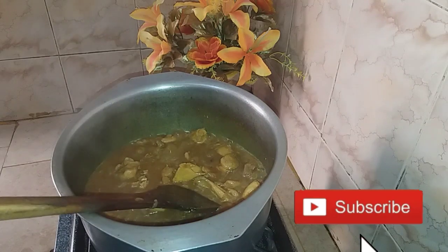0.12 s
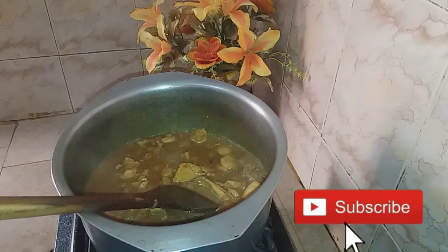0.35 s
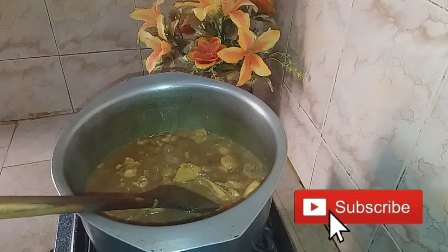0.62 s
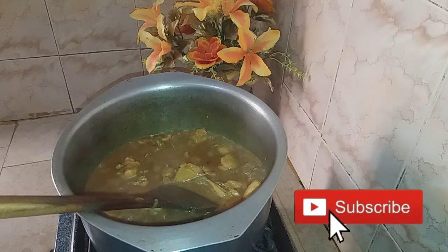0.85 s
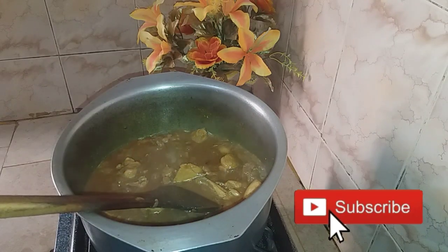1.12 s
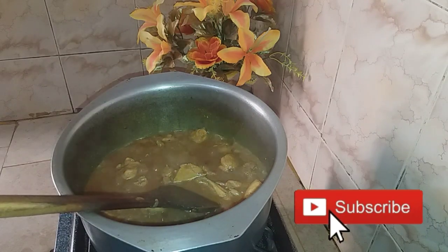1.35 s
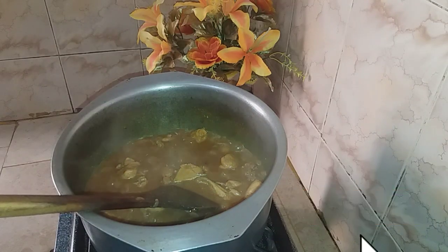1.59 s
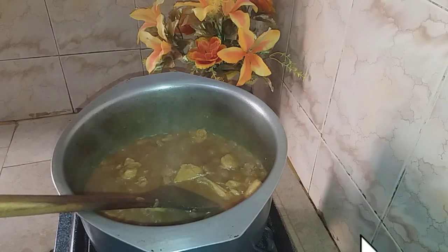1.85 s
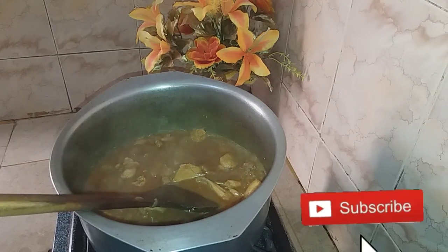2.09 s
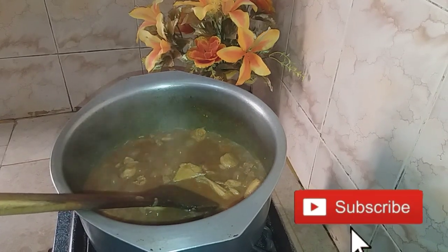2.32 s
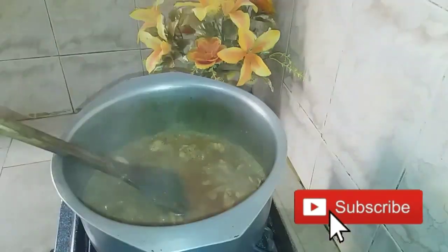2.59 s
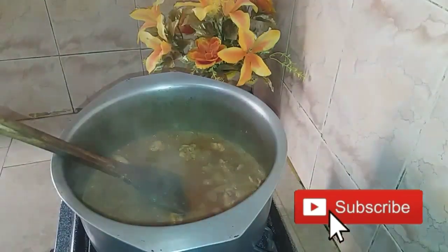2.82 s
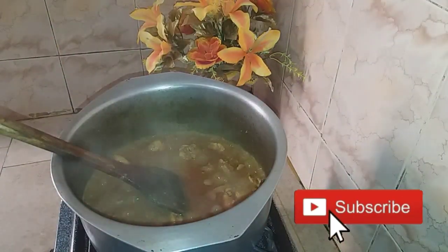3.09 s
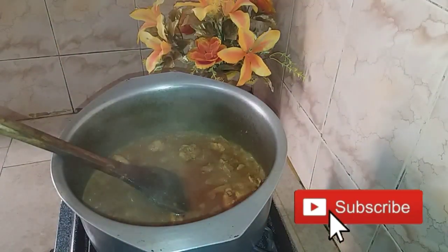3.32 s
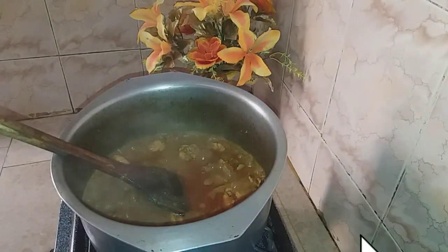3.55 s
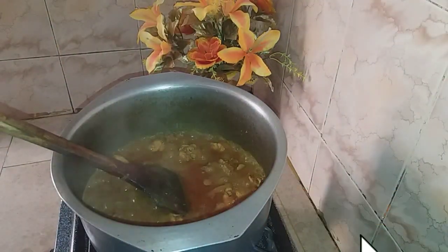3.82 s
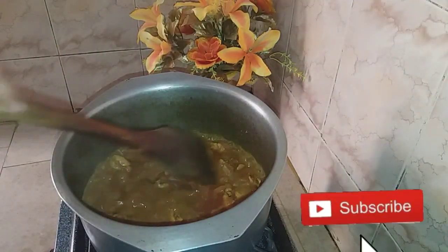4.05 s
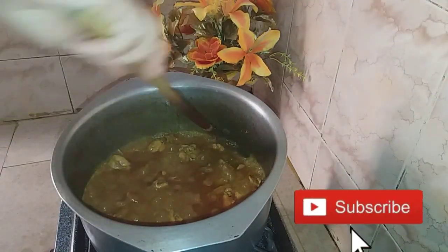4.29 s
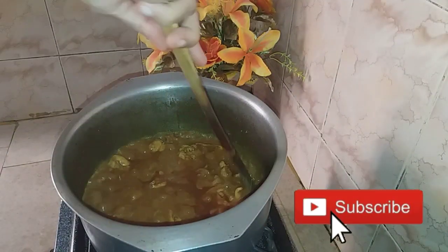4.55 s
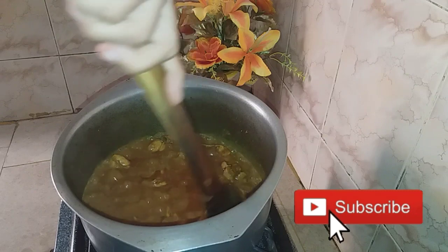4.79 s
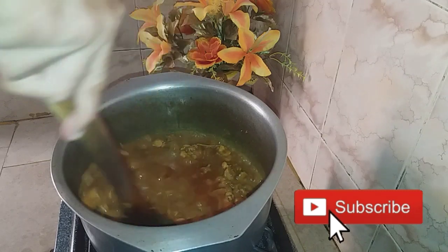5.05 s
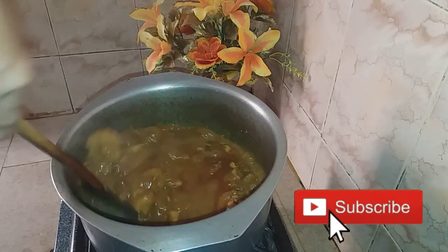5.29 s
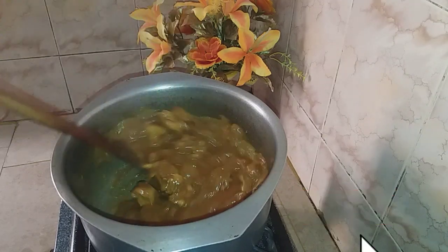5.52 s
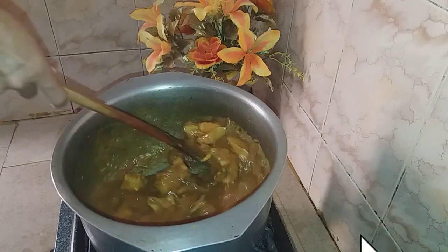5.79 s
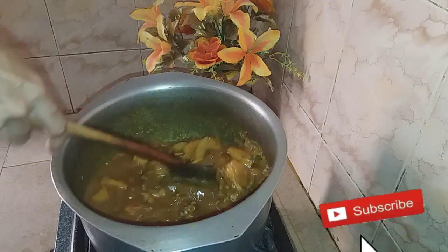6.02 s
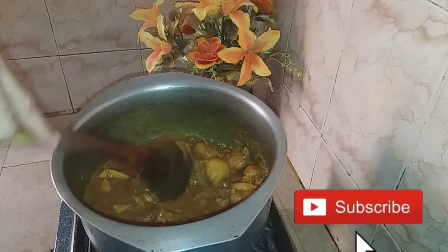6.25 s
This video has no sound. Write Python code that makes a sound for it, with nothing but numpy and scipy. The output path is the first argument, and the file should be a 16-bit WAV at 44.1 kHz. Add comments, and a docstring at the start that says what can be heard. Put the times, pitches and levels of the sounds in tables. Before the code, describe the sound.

Close, boomy handling noise comes first: deep soft bumps, unsteady rumble and quick skin rubs against the microphone housing, with a barely perceptible high electronic whine in rapid blips. A final flurry of knocks and scratches ends it just after 4.5 seconds. Then it is suddenly quiet, with only curry simmering softly in a metal pot and airy kitchen hiss, plus a few dry ticks and a rub in the last half second.

```python
"""A tiled kitchen where a pot of curry simmers, heard through a small microphone that a hand keeps touching.
Grip, thumps and ticks are damped swings sent through the housing; rubs and crackles are bursts of tiny slips.
Filtered noise makes the hiss and the simmer, sines make an electronic whine in blips and one steady line. The
hand lets go at 4.6 s; the hiss gives way to the faint simmer and the room; light touches return near the end."""
import sys
import numpy as np
from scipy import signal
from scipy.fft import rfft, irfft, next_fast_len
from scipy.io import wavfile
from scipy.ndimage import uniform_filter1d

SR = 44100
rng = np.random.default_rng(int(sys.argv[2]) if len(sys.argv) > 2 else 0)


def store_wav(level_fs):
    """Save 16-bit WAV to argv[1]."""
    pcm = np.round(np.clip(np.atleast_2d(level_fs), -1, 1) * 32767)
    wavfile.write(sys.argv[1], SR, pcm.T.astype(np.int16))


def ratio_of_db(decibels):
    """Turn decibels (scalar or array-like) into linear amplitude factors; 0 dB maps to 1."""
    return 10 ** (np.asarray(decibels, float) / 20)


N = 281843

LET_GO_S = 4.6
# spectrum of the hiss while the hand holds on: pitch_hz, density_db (relative, per Hz)
HELD_SPECTRUM = [(150, -40), (250, -8), (313, -6.5), (366, -5), (421, -7), (475, -12), (872, -20),
                 (1300, -22.5), (3090, -30), (7240, -44), (8610, -43.5), (12600, -29), (15800, -35.5)]
# spectrum of the simmer once the hand is off: pitch_hz, density_db (relative, per Hz)
FREE_SPECTRUM = [(30, -16), (60, -43), (110, -13.5), (200, -12), (450, -11.5), (530, -15.5), (1300, -16),
                 (3000, -26), (5000, -30.5), (6800, -37.5), (7650, -43), (10000, -35.5), (15800, -30.5)]
HELD_LEVEL_DB, FREE_LEVEL_DB = -56, -52  # rms before drift and swell
# air in the pot and the room, excited by the simmer: pitch_hz, width_hz, gain_db (before colouring)
POT_RESONANCES = [(142.4, 16.8, 19), (171, 9.1, -4), (227, 11, 7), (299, 34.6, 11), (400, 82, 8),
                  (769, 46, 6.5), (1304, 74, 5)]
# the wash above 600 Hz swells as the spoon drags through the sauce
SWELL_FROM_S, SWELL_DB_PER_S, SLOSH_SPREAD_DB = 5.2, 2, 1

# restless grip, small jolts without end: time_s, level_db (rms)
GRIP_LEVELS = [(0.0, -32.5), (0.3, -33.5), (0.55, -38), (0.75, -35.5), (1.2, -34.5), (1.8, -36), (2.1, -38),
               (2.6, -32), (3.0, -41.5), (3.3, -32), (3.75, -40), (4.2, -38.5), (4.56, -32.5), (4.6, -46),
               (4.66, -69), (5.95, -67), (6.05, -57), (6.25, -63), (6.39, -62)]

# whine on 10 to 15 kHz, one row a kilohertz: blip_db (rms, before each blip's own chance), later_db (rms)
WHINE_LINES = [(-99.5, -101), (-85.5, -105), (-84.5, -105), (-74, -105), (-101, -105), (-79.5, -100)]
# stretches where the whine stays on: start_s, end_s
WHINE_HELD_ON = [(.72, .88), (1.4, 1.45), (1.48, 1.61), (2.6, 2.66), (3.17, 3.26), (3.45, 3.53)]
WHINE_BLIPS_END_S = 4.45
BLIP_RATE_HZ, BLIP_CENTRE_S, BLIP_ON_SHARE, WEAK_BLIP_DB = 25.03, 0.010, 0.31, -1.5
STEADY_LINE_HZ, STEADY_LINE_DB = 15626, -95  # rms

# thumps of the hand on the housing, as sent into it:
# start_s, level_db, pitch_hz, sharpness_q, shell_ring_db (relative to level_db)
THUMPS = [(0.041, -17, 152, 2, -15), (0.1222, -23, 138, 5, -27), (0.179, 3, 60.5, 0.48, -41),
          (0.266, -9.5, 92.5, 1.4, -33), (0.3163, -19.5, 76, 4.4, 0), (0.3792, -25, 120, 4, 2),
          (0.6697, 8, 67.4, 0.89, -32), (0.7054, -10.5, 98, 2.3, -15), (0.8598, -20, 129, 2.2, -18),
          (1.0763, -2, 117, 0.96, -25), (1.3656, -24.5, 109, 5.2, -19), (1.4506, 9, 81, 0.83, -35.5),
          (1.4625, 1.5, 71, 0.85, -29), (1.4856, -18.5, 101, 2.3, -4), (1.6761, 2.5, 142, 1.22, -25),
          (1.6961, -4.5, 75, 1.17, -22), (1.8157, -14, 91, 2.8, -1), (1.9719, -16.5, 124, 4.3, -20),
          (2.1888, -18.5, 128, 3.7, -17), (2.3664, -11.5, 114, 1.14, -5.5), (2.404, -19, 113, 4.4, -32),
          (2.54, -4.5, 147, 2, -21), (2.5564, 2, 51, 0.83, -24.5), (2.578, -17.5, 50, 2.2, -8),
          (2.596, -6, 102, 1.2, -16), (2.6257, 14.5, 103, 0.96, -47), (2.6369, -4, 88.4, 1.4, -7),
          (2.8294, 7.5, 64, 1.19, -42), (2.8411, 5, 150, 1.35, -20), (2.866, -19, 52.3, 1.7, -17),
          (2.9639, -22, 117, 5.7, -21), (3.0845, 2.5, 86, 0.79, -29), (3.1836, -14.5, 116, 1.8, -23),
          (3.261, -15, 123, 2.6, -10), (3.3425, -2, 103, 1.65, -27), (3.3854, -16, 110.5, 3.3, -4),
          (3.4803, -5, 105.6, 2.4, -3), (3.506, -10.5, 81, 1.13, -32), (4.0803, -14, 98, 5.3, 0),
          (4.1201, 1.5, 107, 1.7, -18), (4.3171, -6, 171, 2.95, -10), (4.3324, 0.5, 132, 1.07, -27),
          (4.4526, -1, 82, 0.77, -12.5), (4.4715, -16, 106, 6.1, 0), (4.4823, -12.5, 114.3, 5.7, -1),
          (4.5023, -10, 62, 1.65, -4), (4.5362, -9.5, 204, 1.2, -42), (6.359, -12, 250, 0.97, -27)]
SHELL_HZ, SHELL_Q = 232, 2.1
REBOUND_S = 0.02  # a thump this soon after another swings the other way
# hard ticks of nail or knuckle, as sent into the housing: start_s, level_db, pitch_hz, sharpness_q
TICKS = [(0.0427, -24.5, 490, 2.8), (0.6864, -12, 696, 1.24), (0.7097, -8, 740, 0.6),
         (0.8664, 6, 243, 0.25), (1.4531, -7.5, 990, 1.76), (1.6773, -4.5, 337, 0.27),
         (2.1737, -15, 721, 0.49), (2.4072, 1, 1090, 1.02), (2.5548, -6.5, 407, 0.7),
         (2.5655, -9.5, 1065, 0.65), (2.6278, 4.5, 1195, 1.2), (2.8283, 1.5, 800, 1.22),
         (2.8564, -24, 744, 1.6), (2.9302, 1.5, 315, 0.24), (3.0868, -7.5, 970, 1.1),
         (3.4825, -19.5, 463, 2), (3.9485, -18, 980, 1.3), (4.0992, -23.5, 340, 3.1),
         (4.3167, -17, 356, 5.6), (4.4853, -0.5, 254, 0.6), (4.488, -14, 900, 1.6), (4.5045, 4, 1276, 0.36),
         (4.5371, -2.5, 580, 0.73), (4.562, 6, 596, 0.28), (4.5853, 5.5, 2259, 0.27),
         (6.3302, -27, 872, 1.6), (6.3408, -23, 721, 1.4), (6.3595, -22.5, 700, 1.7)]

# skin sliding on the housing, swelling or fading: start_s, end_s, start_db, end_db, rasp_db (relative)
RUBS = [(0.374, 0.634, -67, -63.5, -13.5), (0.635, 0.714, -58, -47, -20), (1.39, 1.454, -63, -45.5, -21),
        (2.354, 2.411, -79, -35.5, -19), (2.5, 2.564, -64, -46.5, -17), (2.566, 2.632, -53.5, -35, -22),
        (2.826, 2.86, -39.5, -55, -16.5), (3.043, 3.094, -54.5, -45.5, -19.5),
        (3.83, 3.959, -64, -60.5, -15), (4.074, 4.115, -64, -48.5, -15), (4.444, 4.492, -55, -40.5, -17.5),
        (4.492, 4.535, -51.5, -51, -14), (4.536, 4.573, -36.5, -52, -15.5), (4.567, 4.629, -52, -69, -5),
        (4.628, 4.7, -58.5, -64, -22.5), (6.315, 6.397, -64.5, -63, 1.5)]
# spectrum of the body of a rub: pitch_hz, density_db (relative, per Hz)
RUB_SPECTRUM = [(200, -23.5), (400, -6), (800, 4.5), (1500, 2), (2100, -5), (2800, -11), (3500, -32),
                (6000, -57.5)]
# fizz of a rub relative to its body; it is weaker while the hand peels off
RUB_FIZZ_DB, PEEL_FROM_S, PEEL_FIZZ_LOSS_DB = -20, 4.4, 8

# thin bright crackles: start_s, peak_db,
# body_db (below 2.5 kHz, relative to peak_db), fizz_db (above 8 kHz, relative to peak_db)
CRACKLES = [(0.687, -50.5, 3, -6), (1.4525, -57, -1, 1), (1.5435, -62, 12.5, -10), (1.5465, -54, 18, -12),
            (2.4066, -60, 10, -12), (2.5549, -58, 10, -6), (2.5649, -60, 5, -5), (2.6262, -34.5, -2, -4),
            (2.8294, -48, -4, -1), (2.93, -64, 5, -4), (3.0847, -62, 13, -7), (3.1765, -59, 7, -1),
            (4.103, -55, 8, -8), (4.4804, -57, 5, -14), (4.488, -56, 0, -20), (4.5052, -50, -15, -22),
            (4.5256, -55, 8, -12), (4.5417, -55, 5, -12), (4.5564, -60, 3, -16), (4.5674, -58, 4, -12),
            (4.584, -57, -2, -20), (4.595, -55, -9, -15), (4.5987, -47, -6, -16), (4.6083, -52, 6, -12),
            (4.619, -51, 5, -10), (5.9575, -55, 6, -6), (6.2162, -44, 3, -9), (6.2539, -36, -6, -1.5),
            (6.329, -37, 1, -1), (6.3404, -46, 6, -17), (6.3529, -49, 9, -14), (6.3615, -34, 2.5, -16)]


def rms_one(x):
    """Scales x to an rms of 1."""
    return x / np.sqrt(np.mean(x ** 2) + 1e-20)


def in_time(breakpoints):
    """Draws a level in dB through (time, level) points; silent outside them."""
    time_s, level_db = np.transpose(breakpoints)
    return np.interp(np.arange(N) / SR, time_s, level_db, left=-120, right=-120)


def cut(x, hz, kind, order=2):
    """Butterworth filter."""
    sections = signal.butter(order, hz, kind, fs=SR, output="sos")
    return signal.sosfilt(sections, x + 1e-18)


def drift(rate_hz):
    """Slow chance of spread 1: noise through two equal poles, computed on every 40th sample."""
    pole = np.exp(-2 * np.pi * rate_hz * 40 / SR)
    noise = rng.standard_normal(N // 40 + 2002)
    slow = signal.lfilter([1], [1, -2 * pole, pole * pole], noise)[2000:]
    return np.interp(np.arange(N) / 40, np.arange(len(slow)), rms_one(slow))


def coloured(x, spectrum):
    """Shapes x by a spectrum drawn over log frequency; rms 1."""
    hz, db = np.transpose(spectrum)
    size = next_fast_len(N)
    log_hz = np.log(np.arange(size // 2 + 1) * SR / size + 1)
    gain = ratio_of_db(np.interp(log_hz, np.log(hz), db))
    return rms_one(irfft(rfft(x, size) * gain, size)[:N])


def grains(per_s, spread_db):
    """Random clicks, a few much larger than the rest."""
    sizes = ratio_of_db(spread_db * np.minimum(rng.exponential(1, N), 4))
    signs = rng.choice([-1, 1], N)
    return sizes * signs * (rng.random(N) < per_s / SR)


def housing(x):
    """A steep low cut and an all-pass make the lows come late: every jolt sweeps down in pitch."""
    k = np.tan(np.pi * 200 / SR)  # all-pass turning at 200 Hz
    a = (1 - k) / (1 + k)
    return signal.lfilter([a, -1], [1, -a], cut(x, 55, "high", order=8))


def background():
    """Hiss and distant simmer; the pot and room come forward once the hand is off."""
    t = np.arange(N) / SR
    free = np.clip((t - LET_GO_S) / 0.015, 0, 1)  # 15 ms crossfade
    hiss = coloured(rng.standard_normal(N), HELD_SPECTRUM)
    hiss = hiss * ratio_of_db(HELD_LEVEL_DB + 0.4 * drift(8))
    simmer = rng.standard_normal(N) * ratio_of_db(0.78 * drift(45))
    for hz, width_hz, gain_db in POT_RESONANCES:
        b, a = signal.iirpeak(hz, hz / width_hz, SR)
        simmer = simmer + (ratio_of_db(gain_db) - 1) * signal.lfilter(b, a, simmer)
    simmer = coloured(simmer, FREE_SPECTRUM)
    rise_db = SWELL_DB_PER_S * np.maximum(t - SWELL_FROM_S, 0)
    swell = ratio_of_db(rise_db + SLOSH_SPREAD_DB * drift(1.4))
    simmer = simmer + (swell - 1) * cut(simmer, [600, 6000], "band")
    return (1 - free) * hiss + free * ratio_of_db(FREE_LEVEL_DB) * simmer


def grip():
    """Many small jolts, dealt to eight damped swings of different pitch."""
    clicks = grains(200, spread_db=2.5)
    dealt = rng.integers(0, 8, N)
    rumble = 0
    for k, hz in enumerate(np.geomspace(65, 200, 8)):
        radius = np.exp(-np.pi * hz / 2.4 / SR)  # Q of 2.4
        angle = 2 * np.pi * hz / SR
        poles = [1, -2 * radius * np.cos(angle), radius * radius]
        rumble = rumble + signal.lfilter([0, np.sin(angle)], poles, clicks * (dealt == k) + 1e-18)
    rumble = rms_one(housing(cut(rumble, 300, "low", order=3)))
    return ratio_of_db(in_time(GRIP_LEVELS)) * rumble


def whine():
    """Sines on whole kilohertz, gated in strong-weak blips and later faint, and one steady line."""
    t = np.arange(N) / SR
    turns = (t - BLIP_CENTRE_S) * BLIP_RATE_HZ + BLIP_ON_SHARE / 2
    strong_weak = np.where(turns % 2 < 1, ratio_of_db(WEAK_BLIP_DB), 1)
    gate = (turns % 1 < BLIP_ON_SHARE) * strong_weak
    gate = gate * ratio_of_db(4.0 * rng.standard_normal(200))[turns.astype(int)]  # no two blips alike
    for start, end in WHINE_HELD_ON:
        gate[(t > start) & (t < end)] = 1
    gate = uniform_filter1d(gate, size=130)
    out = ratio_of_db(STEADY_LINE_DB) * np.sin(2 * np.pi * STEADY_LINE_HZ * t)
    for k, (blip_db, later_db) in enumerate(WHINE_LINES):
        level = np.where(t < WHINE_BLIPS_END_S, gate * ratio_of_db(blip_db), ratio_of_db(later_db))
        out = out + level * np.sin(2 * np.pi * 1000 * (10 + k) * t)
    return np.sqrt(2) * out  # sine peak for the stated rms


def jolts():
    """Thumps and ticks: damped swings of a mass on a spring; the soft contact rounds each start."""
    swings = [(*tick, -1) for tick in TICKS]
    way, last = -1, -1
    for s, db, hz, q, ring_db in THUMPS:
        way = -way if s - last < REBOUND_S else -1
        last = s
        swings += [(s, db, hz, q, way), (s, db + ring_db, SHELL_HZ, SHELL_Q, way)]
    out = np.zeros(N + SR)
    t = np.arange(SR // 8) / SR
    for s, db, hz, q, way in swings:
        swing = np.exp(-np.pi * hz * t / max(q, 0.3)) * np.sin(2 * np.pi * hz * t)
        contact = (1 - np.exp(-6.0 * hz * t)) ** 2
        out[round(s * SR):][:len(t)] += way * ratio_of_db(db) * swing * contact
    return housing(cut(out[:N], 3600, "low"))


def peel_loss_db(start):
    """The fizz that a rub loses if it starts while the hand peels off."""
    return PEEL_FIZZ_LOSS_DB * (PEEL_FROM_S < start < LET_GO_S + 0.05)


def rubs():
    """Dense tiny slips under each stroke: a dull body, a rasp and a faint fizz on top."""
    slips = grains(7000, spread_db=7.5) * ratio_of_db(1.4 * drift(92))
    body = coloured(slips, RUB_SPECTRUM)
    rasp = rms_one(cut(slips, [2400, 4900], "band", order=4))
    fizz = rms_one(cut(slips, [10000, 13500], "band", order=4))
    out = 0
    for start, end, start_db, end_db, rasp_db in RUBS:
        stroke = ratio_of_db(in_time([(start, start_db), (end, end_db)]))
        stroke = uniform_filter1d(stroke, size=130)
        fizz_db = RUB_FIZZ_DB - peel_loss_db(start)
        out = out + stroke * (body + ratio_of_db(rasp_db) * rasp + ratio_of_db(fizz_db) * fizz)
    return out


def crackles():
    """One sharp slip with a splinter of noise after it, heard as body, edge and fizz."""
    layers = np.zeros((3, N + SR))
    t = np.arange(120) / SR
    for s, db, body_db, fizz_db in CRACKLES:
        burst = 0.27 * rng.standard_normal(len(t)) * np.exp(-t / 0.00066)
        burst[0] = 1
        levels = ratio_of_db(db + np.array([[body_db], [0], [fizz_db]]))
        layers[:, round(s * SR):][:, :len(t)] += levels * burst
    out = 0
    for layer, band_hz in zip(layers, ([600, 2500], [2500, 5800], [8000, 15800])):
        click_peak = np.abs(cut(1.0 * (t == 0), band_hz, "band")).max()
        out = out + cut(layer[:N], band_hz, "band") / click_peak
    return out


def scene():
    """All of it reaches one capsule."""
    return (background() + grip() + whine() + jolts() + rubs() + crackles())[None]


def roll_off(x):
    """The treble ends steeply here."""
    return signal.sosfilt(signal.butter(12, 16470, fs=SR, output="sos"), x)


def record(dry):
    """A steep elliptic low-pass cuts the top above 15.9 kHz."""
    low_pass = signal.ellip(10, 0.5, 45, 15900, fs=SR, output="sos")
    mix = signal.sosfilt(low_pass, dry)
    return roll_off(mix)


dry = scene()
out = record(dry)
store_wav(out)
```